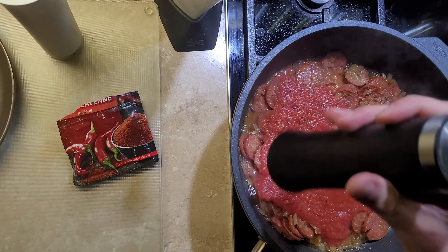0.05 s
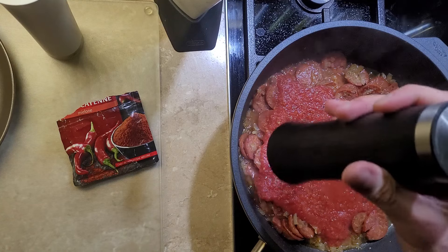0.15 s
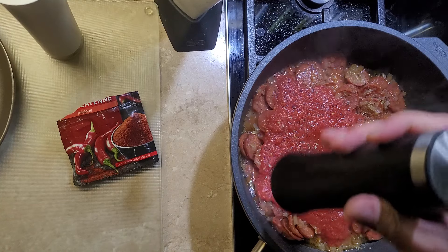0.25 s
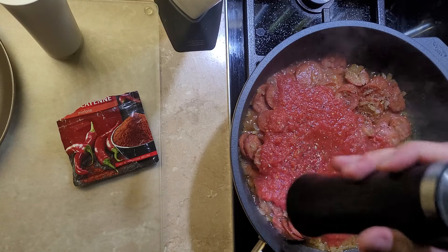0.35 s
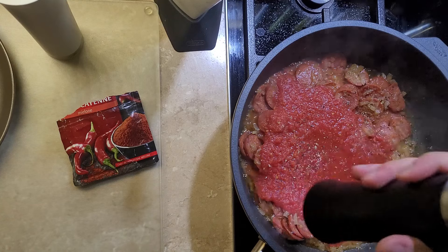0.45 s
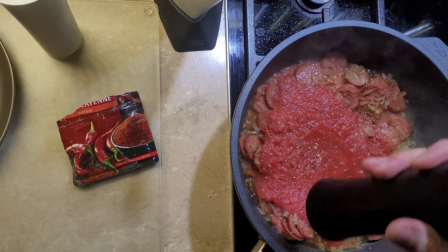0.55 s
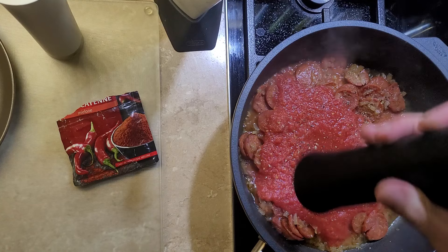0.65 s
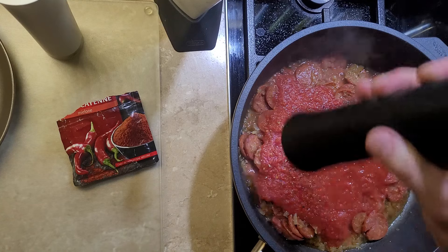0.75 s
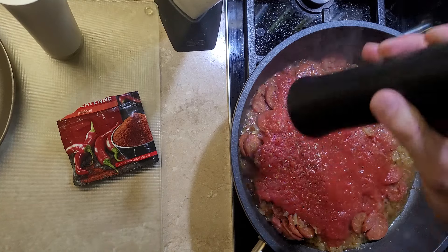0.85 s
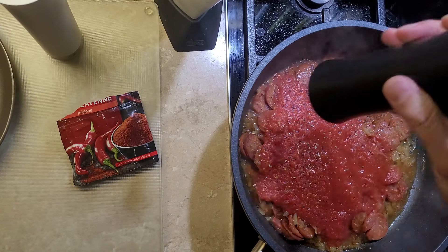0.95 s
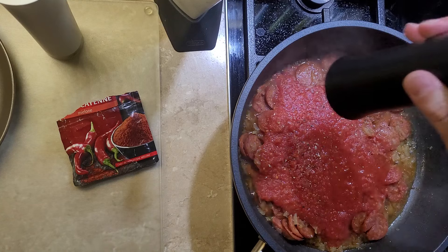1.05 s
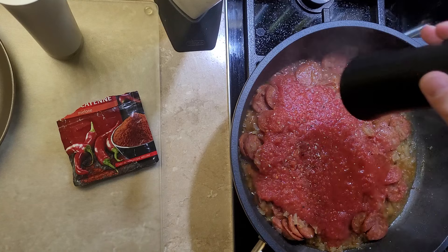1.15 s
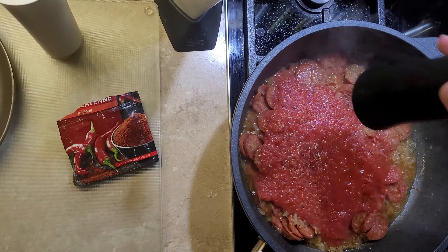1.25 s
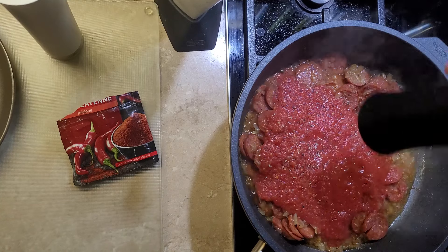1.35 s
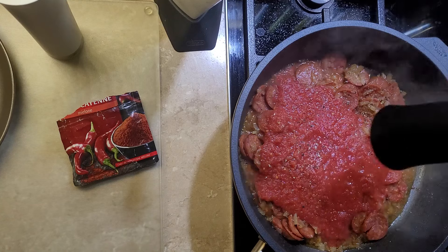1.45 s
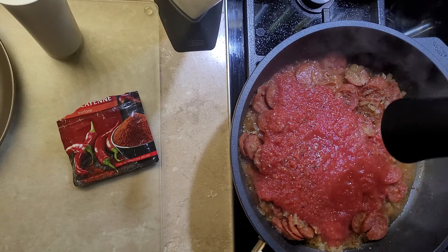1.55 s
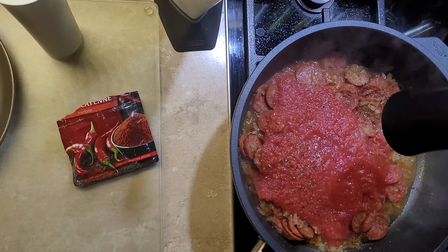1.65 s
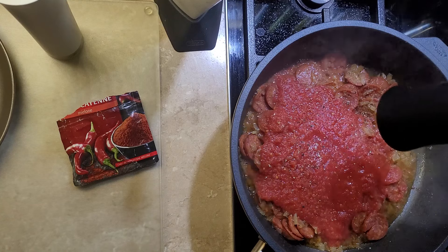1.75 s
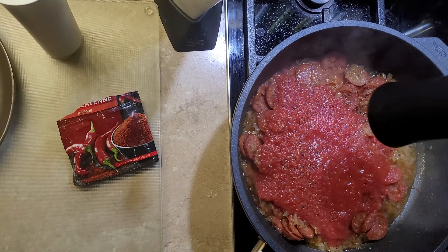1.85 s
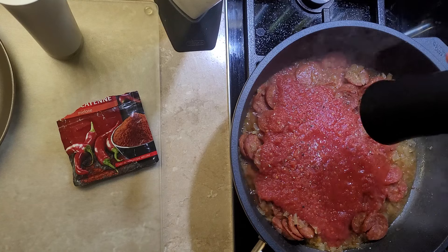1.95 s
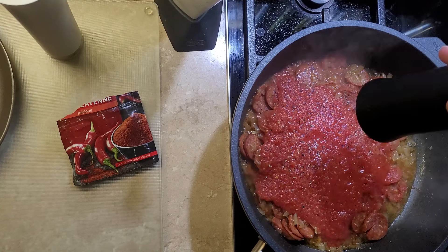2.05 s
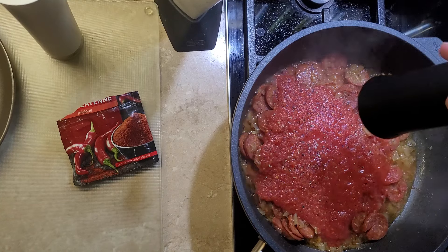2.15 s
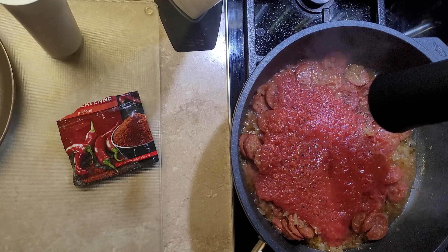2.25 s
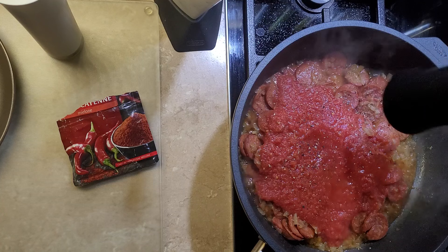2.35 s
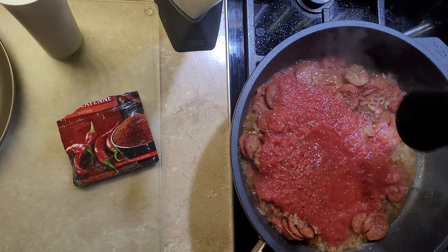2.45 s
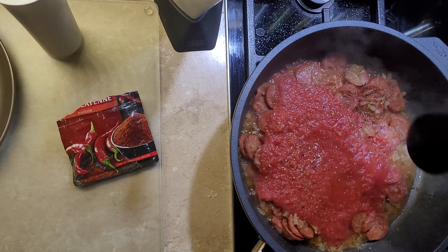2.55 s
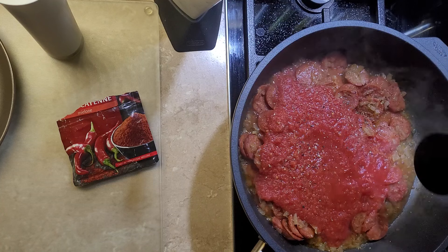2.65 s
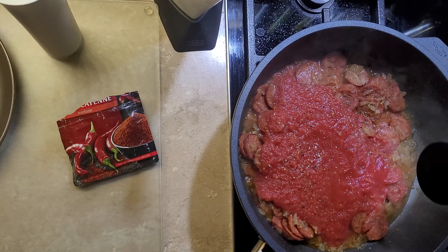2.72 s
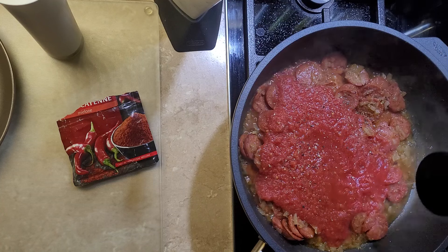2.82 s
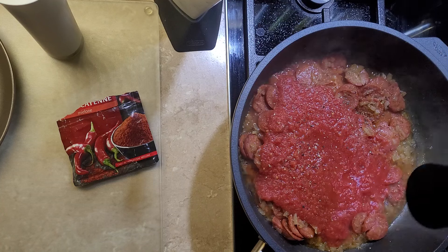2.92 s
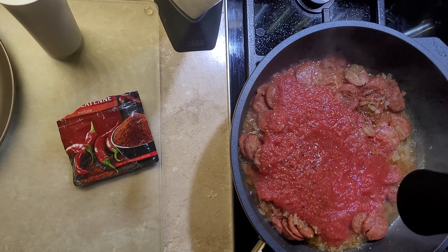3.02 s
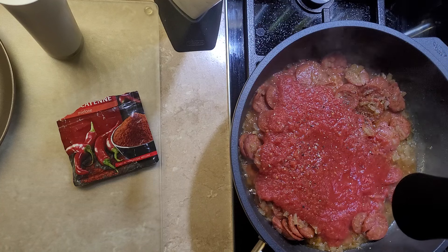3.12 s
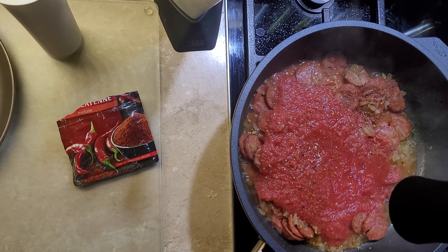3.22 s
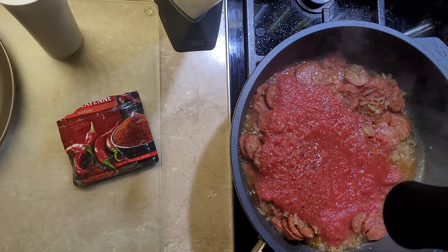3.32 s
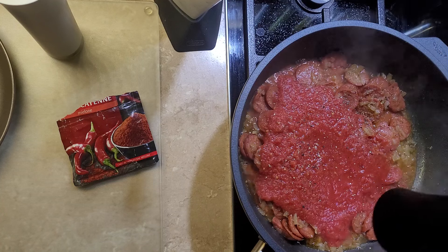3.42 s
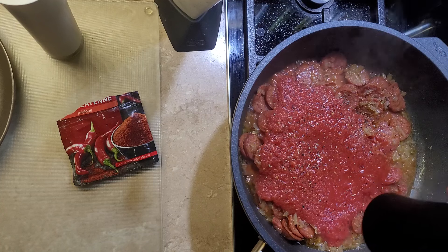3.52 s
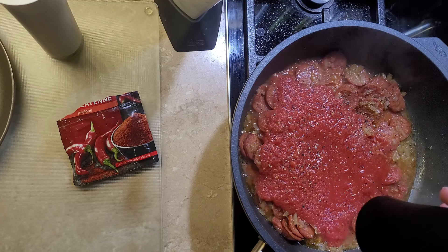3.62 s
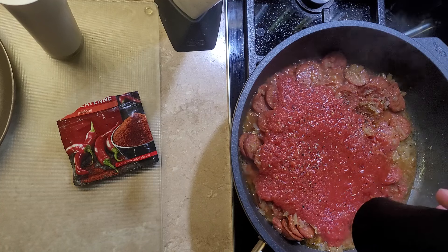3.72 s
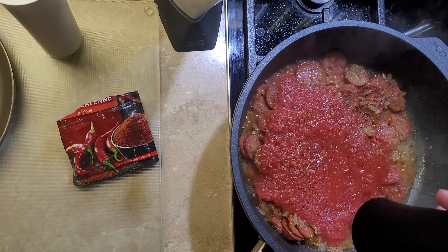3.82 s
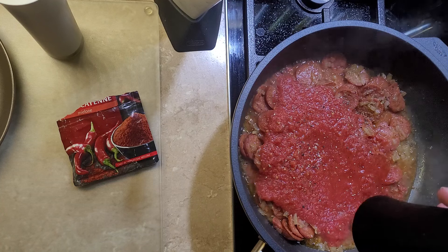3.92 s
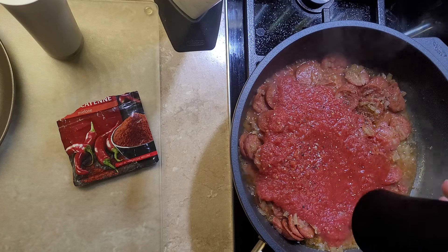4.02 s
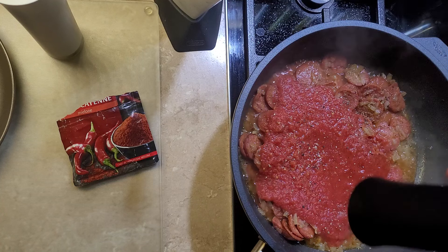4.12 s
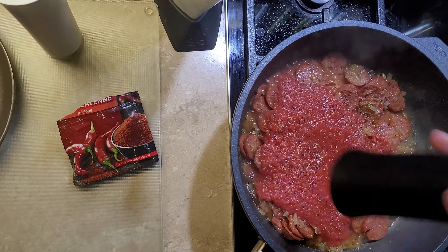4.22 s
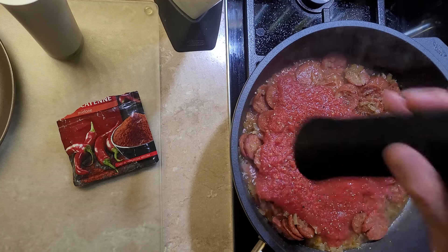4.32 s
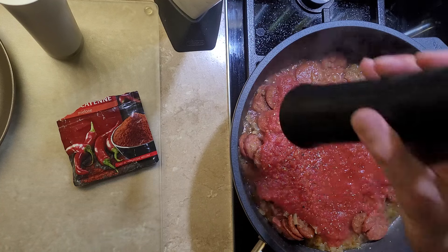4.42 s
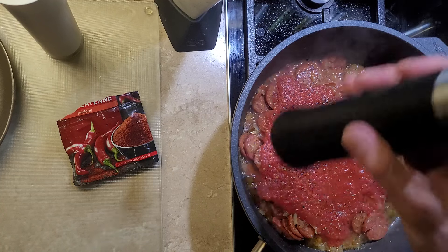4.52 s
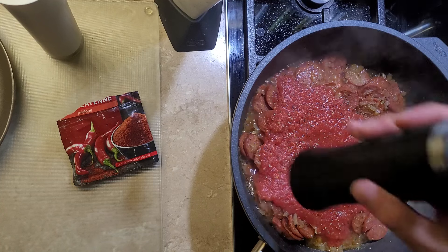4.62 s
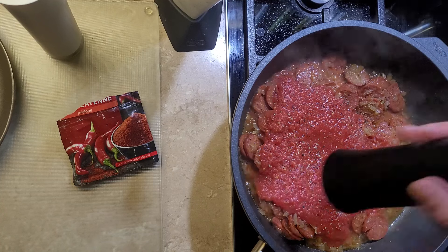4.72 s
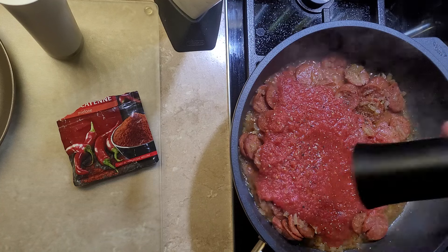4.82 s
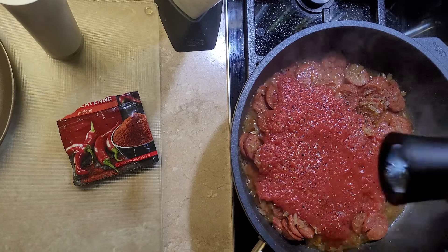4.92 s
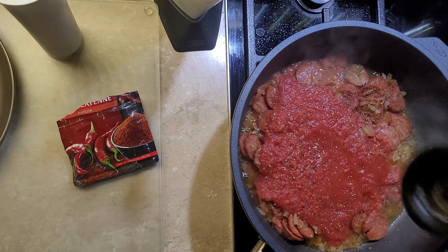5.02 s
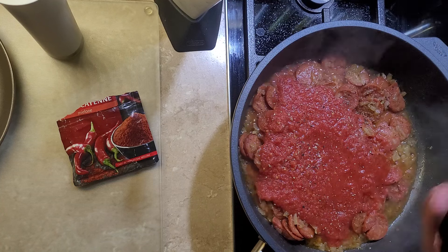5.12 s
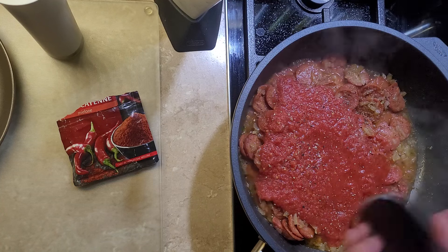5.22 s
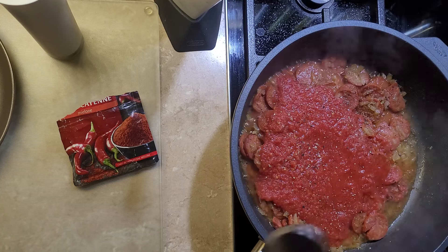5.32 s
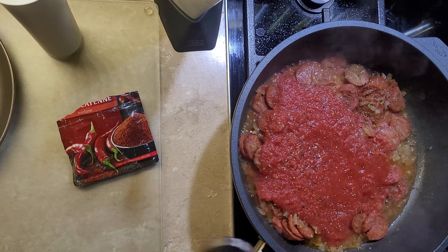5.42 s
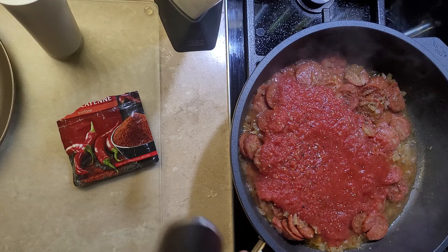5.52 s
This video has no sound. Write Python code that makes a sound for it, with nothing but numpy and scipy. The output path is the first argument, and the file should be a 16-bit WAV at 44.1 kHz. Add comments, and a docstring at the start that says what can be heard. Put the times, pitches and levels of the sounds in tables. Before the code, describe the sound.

A battery pepper mill is already grinding at the start, close to a stereo microphone in a small kitchen with a short, soft room response. Its rough, nasal gear whine, around 1 to 1.4 kHz with strong overtones, keeps sagging and recovering: labouring around 0.6, 0.95, 1.3, 3.8 to 4.1 and 4.65 seconds, freer near 2 and 2.9. Dense gear rattle, gritty scraping and fine cracking of peppercorns surround it, the colour shifting slightly as the mill moves over the pan. A bright snap comes at 0.3, a cluster of dull hand knocks at 0.85 to 0.93, a lighter knock at 1.86, and further snaps at 2.9 and 3.95. Brief narrow buzzes swell at times. The motor speeds up slightly, then cuts out at about 5.1, coasting down in a tenth of a second. Quiet, steady sizzle with tiny spits and a faint low hum remain, with scattered crisp snaps until the end at about 5.6.

```python
"""A battery pepper mill grinds over a pan of simmering sauce, close by in a kitchen.
From the start its gears whine, a stack of partials that sags in pitch under load, while tiny impacts
make the rattle, the scraping and the cracking of corns; snaps, knocks and buzzes stand out here and there.
The mill stops after about five seconds. More snaps follow over what was there all along:
the sizzle with its spits, made of coloured noise and impacts, and a low hum of noise in narrow resonances."""
import sys
import numpy as np
from scipy import signal
from scipy.fft import rfft, irfft, next_fast_len
from scipy.io import wavfile
from scipy.ndimage import map_coordinates

SR = 44100
rng = np.random.default_rng(int(sys.argv[2]) if len(sys.argv) > 2 else 0)


def put_to_file(sound):
    """Save the sound as 16-bit audio at rate SR, in the file named by the first command-line argument."""
    columns = np.atleast_2d(sound).T  # one column per channel
    safe = np.clip(columns, -1, 1)
    whole_steps = np.round(safe * 32767)
    wavfile.write(sys.argv[1], SR, whole_steps.astype(np.int16))


N = 245637  # samples in the scene


def amp(db):
    """Turn decibels into gain."""
    return 10 ** (np.asarray(db) / 20)


def unit(x):
    """Scale a sound to rms 1."""
    return x / np.sqrt(np.mean(x ** 2) + 1e-20)


def along(points, hz):
    """Read a curve of (Hz, value) points, with frequency on a log axis."""
    point_hz, values = np.transpose(points)
    return np.interp(np.log(hz + 1), np.log(point_hz + 1), values)


def curves(rows):
    """Draw one curve over time, a value per sample, for each column after the seconds."""
    seconds, *columns = np.transpose(rows)
    return [np.interp(np.arange(N) / SR, seconds, column) for column in columns]


def wobble(rate):
    """A smooth random curve with `rate` random points a second."""
    coarse = np.linspace(0, N, 4096)  # bend on a coarse grid, then fill in the samples
    points = rng.standard_normal(int(N * rate / SR) + 4)
    bends = map_coordinates(points, [coarse * rate / SR])
    return np.interp(np.arange(N), coarse, bends)


def filtered(x, response):
    """Multiply the spectrum of x by a response that depends on frequency."""
    size = next_fast_len(N + SR // 2)
    hz = np.fft.rfftfreq(size, 1 / SR)
    return irfft(rfft(x, size) * response(hz), size)[..., :N]


def resonance(hz, centre_hz, width_hz):
    """A bell-shaped peak of height 1."""
    return 1 / (1 + (2 * (hz - centre_hz) / width_hz) ** 2)


def lift_db(peaks, hz):
    """Decibels that a set of resonances adds at a frequency."""
    return sum(db * resonance(hz, centre_hz, width_hz) for centre_hz, width_hz, db in peaks)


# How alike left and right are. Each row: frequency in Hz, likeness (1 the same, 0 unrelated, below 0 opposed;
# anything past 1 counts as 1).
LIKENESS = [(100, 1), (300, 1), (600, 1.4), (1100, 0.7), (2000, 0.19), (14000, -0.17)]


def coloured(pair, gain, lead_s=.00013):
    """Two unrelated signals become a stereo sound of rms 1, alike in the bass and a little earlier on the right."""
    def mix(hz):
        turn = np.arccos(np.clip(along(LIKENESS, hz), -1, 1)) / 2
        return gain(hz) * np.array([np.cos(turn), np.sin(turn)])
    mid, side = filtered(pair, mix)
    left, right = np.roll(mid + side, round(lead_s * SR)), mid - side
    return unit(np.array([left, right]))


def grains(rate, spread_db):
    """Tiny impacts, `rate` a second, of scattered size at random moments, reaching both ears; rms 1."""
    size = (rng.random(N) < rate / SR) * amp(spread_db * rng.uniform(-1.9, 1, N))
    signs = np.sign(rng.standard_normal((2, N)))  # each ear gets its own push or pull
    return unit(size * signs)


# How often the teeth of the motor pinion mesh, slower under load. Each row: time in seconds, rate in Hz.
MESH_RATE = [(0.0, 1359), (0.09, 1390), (0.12, 1356), (0.2, 1334), (0.259, 1372), (0.309, 1285),
             (0.379, 1232), (0.489, 1195), (0.554, 990), (0.599, 952), (0.673, 1027), (0.748, 1264),
             (0.798, 1311), (0.828, 1304), (0.863, 1229), (0.888, 1213), (0.928, 1081), (0.958, 1059),
             (0.978, 1068), (1.013, 1170), (1.102, 1192), (1.157, 1155), (1.202, 1154), (1.227, 1098),
             (1.267, 1052), (1.327, 1098), (1.417, 1091), (1.452, 1179), (1.482, 1201), (1.502, 1243),
             (1.561, 1256), (1.621, 1199), (1.716, 1212), (1.756, 1266), (1.796, 1275), (1.831, 1318),
             (1.99, 1371), (2.015, 1347), (2.075, 1357), (2.205, 1250), (2.36, 1281), (2.395, 1212),
             (2.439, 1182), (2.559, 1241), (2.589, 1319), (2.684, 1257), (2.764, 1270), (2.819, 1241),
             (2.849, 1260), (2.913, 1364), (2.958, 1350), (3.003, 1235), (3.068, 1178), (3.128, 1195),
             (3.153, 1256), (3.233, 1292), (3.362, 1287), (3.427, 1240), (3.492, 1281), (3.567, 1272),
             (3.712, 1186), (3.746, 1143), (3.791, 1142), (3.851, 1094), (4.031, 1136), (4.086, 1106),
             (4.195, 1247), (4.3, 1229), (4.37, 1270), (4.435, 1273), (4.5, 1245), (4.59, 1131),
             (4.61, 1084), (4.659, 1079), (4.689, 1085), (4.774, 1201), (4.799, 1284), (4.869, 1380),
             (4.984, 1356), (5.098, 1377)]


def mesh_rate():
    """Tooth-meshing rate in Hz at each sample."""
    return curves(MESH_RATE)[0]


TEETH = 9  # on the pinion: one turn of the shaft meshes nine times


def shaft_angle(jitter=0.0025):
    """Angle of the motor shaft in radians, summed up from its speed, which jitters slightly at random."""
    turns_hz = mesh_rate() * (1 + jitter * wobble(70)) / TEETH
    return 2 * np.pi * np.cumsum(turns_hz) / SR


FREE_HZ, LABOURING_HZ = 1400, 1080  # meshing rate with an empty burr and at full load


def burr_load():
    """0 with an empty burr, 1 when the motor labours, read from how far the meshing has slowed."""
    return np.clip((FREE_HZ - mesh_rate()) / (FREE_HZ - LABOURING_HZ), 0, 1)


def running(stop_s=5.07, coast_s=0.092):
    """A gain of 1 while the motor runs, falling in a straight line to 0 as it coasts."""
    return np.clip((stop_s + coast_s - np.arange(N) / SR) / coast_s, 0, 1)


def line(phase, rough, gap):
    """One stereo partial of rms 1: uneven teeth roughen it, its level flutters, its phase strays between the ears."""
    shaken = phase + rough * wobble(200)
    size = (1 + rough * wobble(120)) * amp(2.2 * wobble(45))
    turn = gap / 2 + .3 * wobble(5)
    lean = amp(wobble(15))  # level drifts from ear to ear
    left = lean * np.cos(shaken + turn)
    right = np.cos(shaken - turn) / lean
    return unit(size * np.array([left, right]))


# Partials of the gear whine. Each row: multiple of the meshing rate, level in dB before its swings,
# roughness from 0 to 1.
WHINE_PARTIALS = [(1, -49.4, .16), (2, -50.3, .22), (3, -50.3, .29), (4, -49.2, .27), (5, -57.5, .34),
                  (6, -58, .32)]
# Swings in loudness as the mill is turned in the hand. Each row: time in seconds, change in dB of the
# lowest partial, of the second, of the third.
LOW_SWINGS = [(0.0, -1.5, -4.0, 0.0), (0.13, -2.0, -6.5, -1.5), (0.19, 0.0, -3.5, 5.5),
              (0.32, -2.5, 2.5, -3.5), (0.49, -3.5, 1.5, 5.5), (0.62, -9.5, -3.0, 0.5),
              (0.84, 5.0, 2.5, 7.5), (1.0, -0.5, 2.0, 3.0), (1.08, 1.0, 6.5, 8.5), (1.18, 2.0, 0.5, 0.5),
              (1.27, -1.5, 2.0, 4.0), (1.43, -4.5, 1.0, -1.5), (1.52, 3.0, 1.5, 2.5),
              (1.62, 1.5, 7.5, 10.5), (1.71, 0.0, 9.5, 8.0), (1.78, 7.0, 4.0, 3.0), (1.87, 6.0, -1.5, 8.0),
              (1.95, 4.0, -8.0, -0.5), (2.15, 8.5, -4.5, 4.5), (2.23, 5.5, -6.5, 4.0),
              (2.32, 11.0, -0.5, -1.0), (2.42, 0.5, 5.0, 4.5), (2.5, -5.5, 3.0, -6.5),
              (2.57, -5.5, -6.5, -5.5), (2.67, 0.0, 0.5, 1.5), (2.82, 0.5, 2.0, 2.0),
              (2.89, 1.0, -3.5, -2.5), (2.96, 4.0, 1.5, 1.0), (3.06, -3.5, 9.5, 3.5),
              (3.27, 5.5, -4.0, -5.0), (3.34, 7.5, 1.0, 0.5), (3.48, 3.5, -7.5, -4.5),
              (3.57, 6.0, -2.5, -3.0), (3.68, -2.5, -2.0, 7.0), (3.77, -4.0, 0.5, 3.0),
              (3.87, -6.0, 3.0, 11.5), (4.0, -2.5, 4.0, -2.0), (4.26, 5.5, 2.5, -2.0),
              (4.38, -2.0, 0.0, -6.0), (4.64, -3.0, 1.5, 8.5), (4.74, -0.5, -4.0, -1.5),
              (5.1, -6.5, -10.5, -9.5)]
# Swings of the higher partials, which squeal when a corn jams the burr. Each row: time in seconds, change in dB.
HIGH_SWINGS = [(0, -11), (.3, -3), (.55, 4), (.68, 3), (.77, -9), (.94, 8), (1.01, 3), (1.1, 7), (1.38, 7),
               (1.46, -2), (1.56, 4), (1.9, -6), (2.2, -7), (2.38, -1), (2.55, -8), (2.9, -11), (3.05, -3),
               (3.3, -7), (3.6, -4), (3.73, 7), (3.92, 8.5), (4.05, 6), (4.13, 2), (4.33, -1), (4.47, -7),
               (4.64, 7), (4.73, -2), (4.9, -8)]
# Phase gap between the ears, shifting as the mill moves over the pan. Each row: time in seconds, average gap
# in radians for the lowest partial, the second, the third.
PHASE_GAPS = [(0, -.3, .6, 2.7), (.5, -.5, .3, 2.4), (.8, -.6, 1.8, 2), (1.1, -1.1, 2, 2.7),
              (1.3, -1.2, .6, 1.6), (1.65, -2, 2.9, .8), (2.0, -.7, 2.8, .2), (2.4, -1.3, 2.6, .2),
              (3.05, 0, 2.5, 1.2), (3.35, .1, 1, 1.5), (3.9, -.8, -.3, 1.9), (4.25, -.5, .8, 1.5),
              (4.65, -.5, 1.5, 1.5)]
HIGH_GAP = .6  # average gap of the higher partials, radians
# A casing resonance that lifts a partial gliding through it. Each row: centre in Hz, width in Hz, lift in dB.
WHINE_LIFT = [(7080, 180, 5)]
# Weaker lines of the motor. Each row: multiple of the shaft speed, relative level in dB running free,
# relative level in dB at full load.
MOTOR_LINES = [(3, -67, -65), (4, -66, -64), (5, -63, -62), (8, -58, -62), (10, -59, -58), (15, -62, -60),
               (17, -56, -61), (21, -62, -51.5), (24, -60, -51.5), (25, -62, -55), (26, -54, -53.5),
               (28, -52, -58), (30, -57, -55), (33, -59, -53.5), (34, -60, -52), (39, -62, -54.5),
               (42, -62, -56), (48, -61, -58), (51, -63, -54.5), (57, -66, -57.5)]
SHAFT_DB, SHAFT_ROUGH = -1.5, .3  # added level in dB, and roughness, of the motor's lines
SHAFT_SHARE = .4  # the motor's lines follow this share of the third partial's swings


def whine(angle):
    """Meshing teeth sing a stack of harmonics blurred by their play; load changes the motor's lines in between."""
    mesh_hz, load = mesh_rate(), burr_load()
    swing_db = curves(LOW_SWINGS) + curves(HIGH_SWINGS)
    gaps = curves(PHASE_GAPS) + [HIGH_GAP]
    out = 0
    for multiple, level_db, rough in WHINE_PARTIALS:
        own = min(multiple, len(swing_db)) - 1  # the fourth and above share one curve
        db = level_db + lift_db(WHINE_LIFT, multiple * mesh_hz) + swing_db[own]
        out = out + amp(db) * line(multiple * TEETH * angle, rough, gaps[own])
    for multiple, free_db, loaded_db in MOTOR_LINES:
        level_db = SHAFT_DB + free_db + load * (loaded_db - free_db)
        db = level_db + SHAFT_SHARE * swing_db[2]
        out = out + amp(db) * line(multiple * angle, SHAFT_ROUGH, gap=rng.uniform(-2.1, 2.4))
    return out


POLES = 3  # beats per turn from the motor's poles


def chatter(angle, tooth=0.26, pole=0.11, flutter_db=.5):
    """Dense tiny impacts that come in step with the pinion's teeth and the motor's poles."""
    beat = 1 + tooth * np.cos(TEETH * angle) + pole * np.cos(POLES * angle)
    return beat * amp(flutter_db * wobble(45)) * grains(rate=26000, spread_db=2.0)


# How loud the gears rattle. Each row: time in seconds, relative level in dB.
RATTLE_LEVEL = [(0.0, -39.5), (0.3, -37), (0.6, -39.5), (0.9, -38), (1.9, -37), (2.6, -39), (3.4, -37),
                (3.8, -38.5), (4.25, -36.5), (4.45, -38.5), (4.78, -37.5), (4.9, -40), (5.07, -42)]
# Colour of the gear train. Each row: frequency in Hz, relative strength in dB.
GEAR_COLOUR = [(150, -31), (260, -19), (400, -28), (510, -8.5), (900, -13), (1150, -10), (1650, -10.5),
               (2450, -5.5), (2850, -8.5), (3200, -4.5), (3800, -4), (4500, -3), (5300, -6.5), (6900, -19),
               (8600, -27), (15000, -47)]
# Resonances of the casing. Each row: centre in Hz, width in Hz, lift in dB.
CASING_PEAKS = [(641, 23, 4.5), (1324, 36, 5), (2000, 70, 6), (2450, 350, 3), (7050, 520, 8)]


def rattle(angle, level_db=0.5, unsteady_db=.5):
    """Loose gears chatter against each other and ring the casing."""
    gear_db, = curves(RATTLE_LEVEL)
    ring = coloured(chatter(angle), lambda hz: amp(along(GEAR_COLOUR, hz) + lift_db(CASING_PEAKS, hz)))
    return amp(gear_db + level_db + unsteady_db * wobble(16)) * ring


def backlash(ring_hz=3970, width_hz=350, free_db=-42, damped_db=10):
    """Running light, the slack gears keep one casing resonance ringing; load presses them together and quiets it."""
    ring = coloured(grains(rate=9000, spread_db=3), lambda hz: resonance(hz, ring_hz, width_hz))
    return amp(free_db - damped_db * burr_load()) * ring


# How much pepper the burr is biting. Each row: time in seconds, feed in dB around an ordinary feed.
PEPPER_FEED = [(0.0, -1.5), (0.29, 1.5), (0.39, -0.5), (0.48, 1.5), (0.58, -3.5), (0.86, 1.5), (0.96, -1),
               (1.08, 1), (1.27, -1), (1.5, 1), (1.82, 1.5), (1.99, -3.5), (2.15, 1), (2.45, 2),
               (2.56, -1.5), (2.68, -0.5), (2.81, 1), (2.87, -2.5), (2.99, 2), (3.14, -1.5), (3.35, 0.5),
               (3.95, -1.5), (4.31, 1.5), (4.42, -1), (4.56, 1), (4.79, -2), (4.88, -5), (5.0, -1.5)]
# Colour of corns scraping along the burr. Each row: frequency in Hz, relative strength in dB.
SCRAPE_COLOUR = [(3000, -29), (5200, -18), (6200, -0.5), (6950, -3.5), (7700, -3.5), (9000, -12.5),
                 (14000, -40)]
# Colour of corns cracking in the burr. Each row: frequency in Hz, relative strength in dB.
CRACK_COLOUR = [(1500, -22.5), (4000, 3), (7000, 1), (8800, -3), (9800, -0.5), (11300, -1), (12800, 4.5),
                (14200, -2.5), (16000, -10.5)]
CRACK_DB, SCRAPE_DB = -39.5, -45  # levels at an ordinary feed
SCRAPE_GROWS = 1.9  # dB of scraping per dB of feed: it swings wider than the cracking


def crushing(angle, clump_db=1.0, slip_db=1.0):
    """The burr scrapes the corns along and breaks them in clumps of tiny cracks; both follow the feed."""
    feed_db, = curves(PEPPER_FEED)
    rub_db = SCRAPE_DB + SCRAPE_GROWS * feed_db + slip_db * wobble(12)
    scrape = amp(rub_db) * coloured(chatter(angle), lambda hz: amp(along(SCRAPE_COLOUR, hz)))
    clumps = grains(rate=18000, spread_db=2.5) * amp(clump_db * wobble(80))
    cracks = amp(CRACK_DB + feed_db) * coloured(clumps, lambda hz: amp(along(CRACK_COLOUR, hz)))
    return scrape + cracks


# Reflections from the pan. Each row: typical delay in seconds, strength as a plain factor.
PAN_BOUNCES = [(.0007, .33), (.0019, .3)]
SWAY = .1  # share by which the hand sways each delay


def over_pan(x):
    """The pan's wall and floor throw back copies whose delays wander with the hand, so the colour keeps shifting."""
    n = np.arange(N)

    def bounce(ear, delay_s):
        swaying_s = delay_s * np.exp(SWAY * wobble(1.592))
        return np.interp(n - SR * swaying_s, n, ear)
    return np.array([ear + sum(strength * bounce(ear, delay_s) for delay_s, strength in PAN_BOUNCES)
                     for ear in x])


# Brief narrow buzzes of mill and motor, each swelling and sinking. Each row: time of the peak in seconds,
# seconds from there until it has sunk to 37 %, centre in Hz, width in Hz, level in dB at the peak.
NARROW_BUZZES = [(.12, 0.34, 272, 66, -56.5), (.17, .12, 4250, 130, -49), (.3, 0.7, 790, 570, -52.5),
                 (1.57, .06, 4940, 120, -42), (1.7, 0.32, 4000, 450, -39.5),
                 (2.984, 0.19, 274, 45.36, -59.5), (3.3, 0.23, 6750, 450, -43),
                 (3.65, 0.53, 9740, 450, -49.5), (4.198, 0.087, 3890, 200, -39.5),
                 (4.79, 0.076, 4100, 700, -40), (4.92, 0.065, 460, 36, -50), (5.0, 0.13, 2520, 200, -48),
                 (5.017, 0.08, 4420, 350, -48)]


def buzzes():
    """Mill and motor buzz briefly in one narrow band or another: filtered noise that swells and sinks."""
    t = np.arange(N) / SR
    out = 0
    for peak_s, length_s, centre_hz, width_hz, db in NARROW_BUZZES:
        buzz = coloured(rng.standard_normal((2, N)), lambda hz: resonance(hz, centre_hz, width_hz))
        swell = np.exp(-((t - peak_s) / length_s) ** 2)
        out = out + amp(db) * swell * buzz
    return out


# Dull knocks of the mill in the hand. Each row: start in seconds, relative level in dB.
HAND_KNOCKS = [(.841, -33), (.891, -31), (0.91, -34), (.926, -27), (1.861, -34), (5.063, -40)]
# What a knock rings with. Each row: frequency in Hz, typical level in dB, seconds to fade by 60 dB.
BODY_RINGS = [(657, -31, 0.031), (1116, 2, 0.02), (1367, 1, 0.05), (2500, -23, .02)]


def knocks(level_db=-3.5):
    """Each knock rings the mill's body as fading sines, at new strengths."""
    out, t = np.zeros(N + SR), np.arange(SR // 8) / SR
    for start_s, db in HAND_KNOCKS:
        ring = 0
        for hz, ring_db, t60 in BODY_RINGS:
            fading_db = ring_db + rng.normal(0, 2.4) - 60 * t / t60
            ring = ring + amp(fading_db) * np.sin(2 * np.pi * hz * t)
        out[round(start_s * SR):][:len(t)] += amp(db + level_db) * ring
    return out[:N]


# Short bright snaps. Each row: start in seconds, relative level in dB, brightest frequency in Hz.
BRIGHT_SNAPS = [(.296, -22, 8000), (.925, -34, 12000), (2.897, -30, 12000), (3.948, -22, 14500),
                (5.138, -32, 14000), (5.18, -30.5, 13000), (5.204, -28, 10000), (5.272, -29, 14500),
                (5.382, -27, 6900), (5.391, -27.5, 6500), (5.454, -23, 14000), (5.533, -31, 7000)]


def snaps(t60=0.0071, tail_db=-11, tail_t60=0.056, level_db=-6, width_hz=6500, rise_s=.00025):
    """Each snap is a short bright burst of noise with a weaker, longer tail."""
    out, t = np.zeros((2, N + SR)), np.arange(SR // 10) / SR
    burst, tail = amp(-60 * t / t60), amp(tail_db - 60 * t / tail_t60)
    shape = (1 - np.exp(-t / rise_s)) * (burst + tail)
    hz = np.fft.rfftfreq(len(t), 1 / SR)
    for start_s, db, bright_hz in BRIGHT_SNAPS:
        noise = rng.standard_normal((2, len(t)))
        fizz = irfft(rfft(noise) * resonance(hz, bright_hz, width_hz), len(t))
        out[:, round(start_s * SR):][:, :len(t)] += amp(db + level_db) * shape * unit(fizz)
    return out[:, :N]


# Colour of the simmering pan. Each row: frequency in Hz, relative strength in dB.
PAN_COLOUR = [(160, -11.5), (270, -4.5), (400, -6), (540, -12), (640, 0.5), (830, 0), (970, -2),
              (1150, 1.5), (1550, -5), (3500, -6), (7000, -7.5), (9000, -17), (12000, -12), (16000, -13.5)]


def sizzle(level_db=-43.0, spit_db=-13):
    """Countless bubbles burst in the sauce as noise; single spits stand out in the treble."""
    spits = filtered(grains(rate=290, spread_db=17), lambda hz: hz / (hz + 4000))
    bubbles = rng.standard_normal((2, N)) + amp(spit_db) * unit(spits)

    def colour(hz):
        bass_cut = hz ** 4 / (hz ** 4 + 130 ** 4)
        return amp(along(PAN_COLOUR, hz)) * bass_cut
    return amp(level_db + 0.41 * wobble(12)) * coloured(bubbles, colour)


# How loud the low hum of the kitchen is. Each row: time in seconds, level in dB.
HUM_LEVEL = [(0.0, -64), (0.75, -66), (1.02, -56), (1.15, -63), (1.3, -52), (1.65, -63.5), (1.88, -63),
             (2.05, -52.5), (2.4, -62.5), (2.8, -60), (2.95, -66), (3.3, -59), (3.44, -51.5), (3.68, -56.5),
             (3.8, -67), (4.7, -62), (4.9, -55.5), (5.08, -63), (5.57, -58.5)]
# Resonances of the hum. Each row: centre in Hz, width in Hz, relative strength in dB.
HUM_PEAKS = [(67.3, 21, -7.5), (113, 13, 0), (137.6, 51, -3)]


def hum():
    """A low hum swells and wavers: noise squeezed through a few narrow resonances."""
    hum_db, = curves(HUM_LEVEL)

    def modes(hz):
        return sum(amp(db) * resonance(hz, centre_hz, width_hz) for centre_hz, width_hz, db in HUM_PEAKS)
    return amp(hum_db) * coloured(rng.standard_normal((2, N)), modes)


# How long the room rings. Each row: frequency in Hz, seconds to fade by 60 dB.
ROOM_FADE = [(200, 0.33), (2000, 0.23), (12000, 0.15)]


def kitchen(x):
    """The room's short answer: fading noise, a different one for each ear, starting after 4 ms."""
    hz, t, noise = signal.stft(rng.standard_normal((2, SR // 3)), SR, nperseg=256)
    fade = amp(-60 * t / along(ROOM_FADE, hz)[:, None])
    tail = signal.istft(noise * fade, SR, nperseg=256)[1]
    answer = np.pad(tail, ((0, 0), (SR // 250, 0))) / np.linalg.norm(tail[0])
    return signal.fftconvolve(x, answer, axes=1)[:, :N]


# Balance between the ears. Each row: frequency in Hz, dB by which left is raised over right.
EAR_BALANCE = [(100, -2.5), (550, 0), (1250, -1.5), (1900, 0), (2500, -1.5), (3500, 0), (5000, -2),
               (6800, -7), (8000, 1), (9500, 2.5), (12500, 0), (15000, -2)]


def scene():
    """Mill and pan in the room, with the hum behind and each pitch region balanced between the ears."""
    angle = shaft_angle()
    grinding = over_pan(rattle(angle) + crushing(angle))
    mill = running() * (whine(angle) + backlash() + grinding + buzzes())
    near = mill + knocks() + snaps() + sizzle()
    heard = near + amp(-10.0) * kitchen(near) + hum()
    return filtered(heard, lambda hz: amp(np.outer([.5, -.5], along(EAR_BALANCE, hz))))


def record(dry, low_hz=42, top_hz=15900):
    """Shed the deepest bass and keep nothing from the top frequency up."""
    return filtered(dry, lambda hz: (hz < top_hz) * hz ** 2 / np.sqrt(hz ** 4 + low_hz ** 4))


dry = scene()
out = record(dry)
put_to_file(out)
```